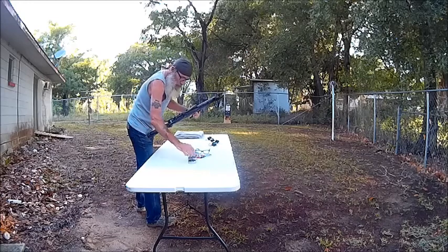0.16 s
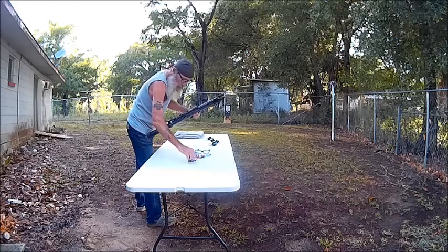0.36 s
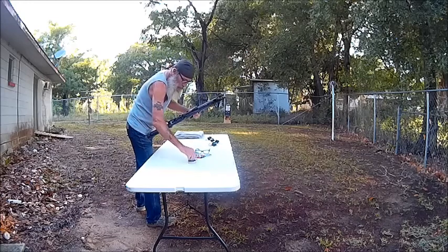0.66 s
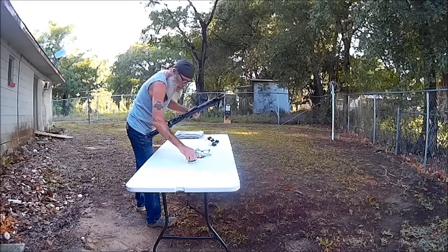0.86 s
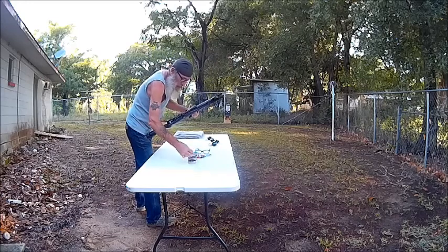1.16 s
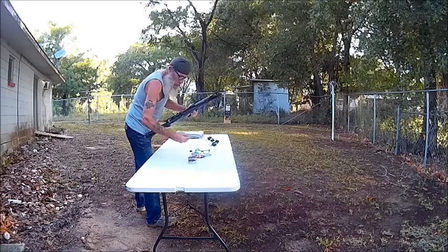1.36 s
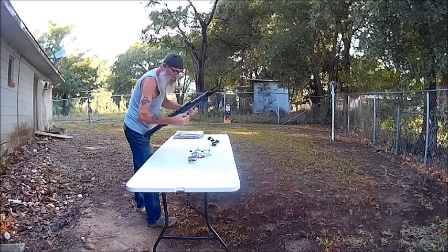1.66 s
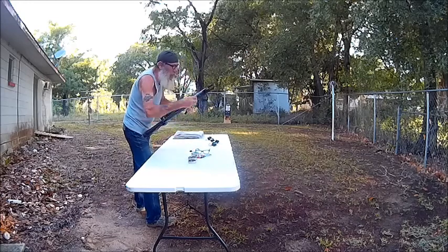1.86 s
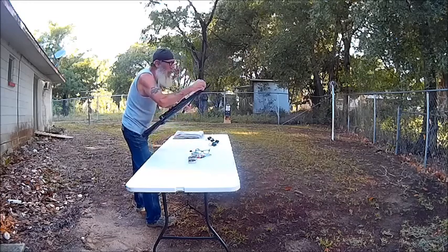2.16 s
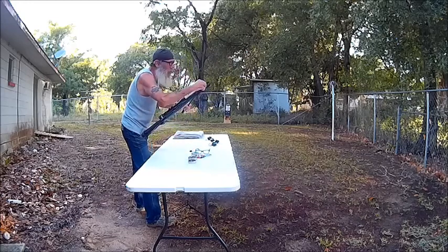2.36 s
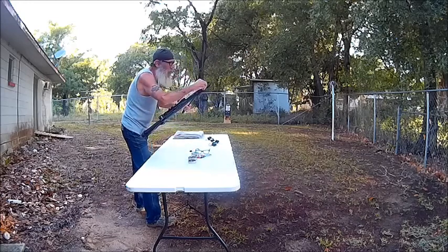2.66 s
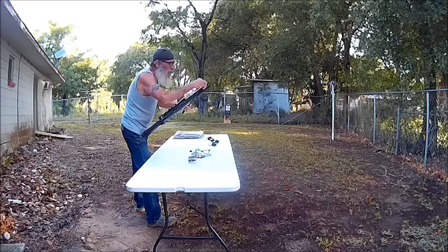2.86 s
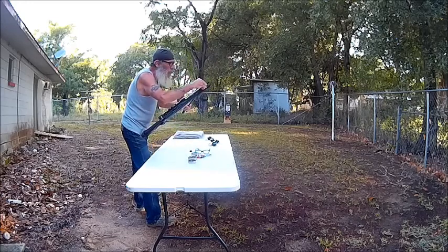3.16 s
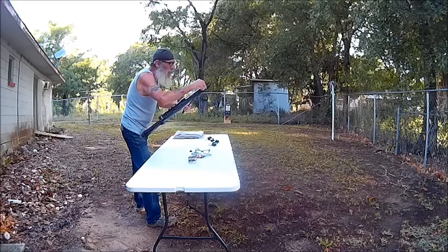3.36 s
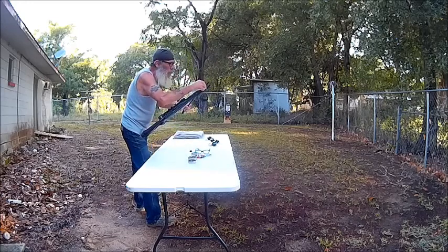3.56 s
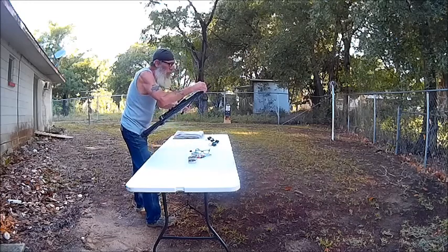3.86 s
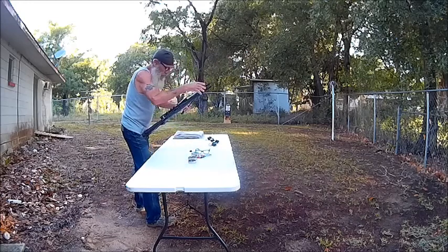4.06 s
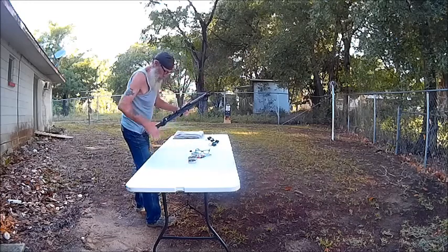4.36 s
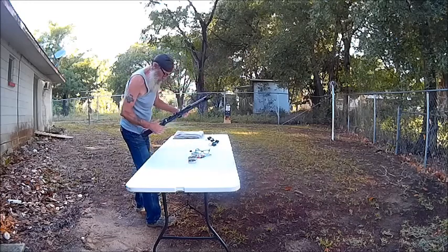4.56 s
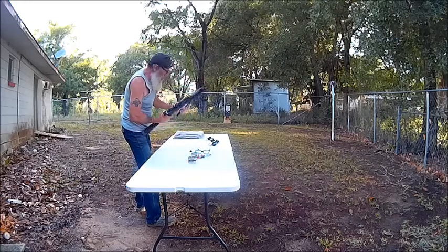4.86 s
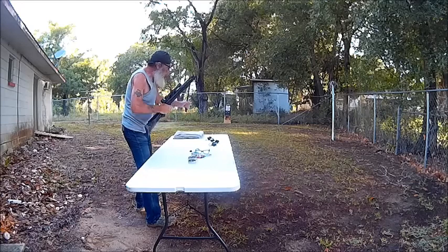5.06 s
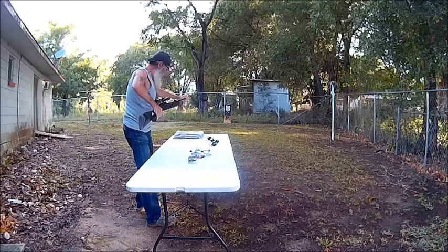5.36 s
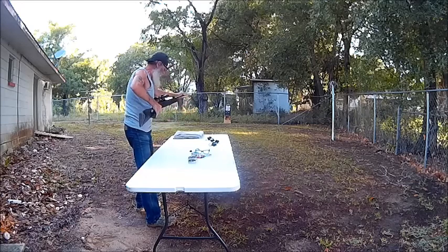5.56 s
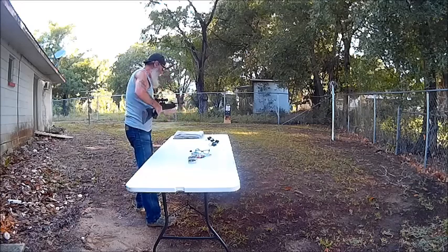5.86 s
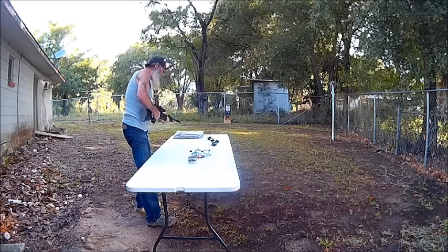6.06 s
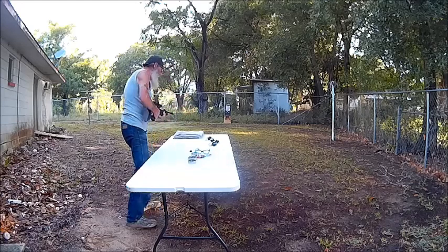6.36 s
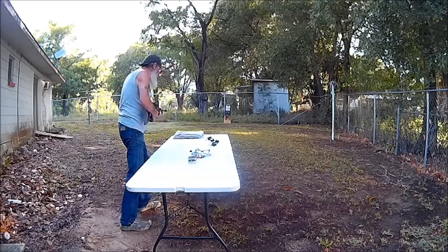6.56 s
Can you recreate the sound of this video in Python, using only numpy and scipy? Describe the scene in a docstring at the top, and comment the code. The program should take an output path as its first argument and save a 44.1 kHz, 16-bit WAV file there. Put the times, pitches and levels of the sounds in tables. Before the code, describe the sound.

An air rifle barrel swings shut with a brief squeak and a sharp clack, outdoors over a faint, steady air conditioner hum.

```python
"""An air conditioner hums in a backyard, its fan rushing over a low rumble and a faint, far engine.
A bird whistles, an air rifle clicks softly in the hands, and the engine speeds up. At five seconds the
barrel is swung shut: stick-slip friction makes the hinge scrape and squeal, the latch rides over its
catch, and the breech closes with a clack that excites the modes of steel and stock.
The ground, table, house wall and fence reflect the sound."""
import sys
import numpy as np
from scipy import signal
from scipy.fft import rfft, irfft, next_fast_len
from scipy.io import wavfile

SR = 44100
rng = np.random.default_rng(int(sys.argv[2]) if len(sys.argv) > 2 else 0)


def master_out(mix):
    """Clip the mix to full scale and print it as 16-bit PCM to the path in sys.argv[1]."""
    frames = np.transpose(np.atleast_2d(mix))
    ceiling = np.clip(frames, -1, 1)
    pcm = np.round(ceiling * 32767).astype(np.int16)
    wavfile.write(sys.argv[1], SR, pcm)


N = 296386
TIME = np.arange(N) / SR
CONTACT_RISE_S = .0006  # time constant with which an impact builds

# Outdoor rumble. Each row: frequency in Hz, relative spectral density in dB.
RUMBLE_SPECTRUM = [(10, -13), (25, -9.5), (45, 0.5), (110, 0.5), (180, -7.5), (260, -9.5), (480, -16),
                   (1000, -20), (2000, -27.5), (3300, -37.5), (8000, -57)]
# The microphone's self-noise. Each row: frequency in Hz, relative spectral density in dB.
HISS_SPECTRUM = [(1000, -1.5), (4000, 4), (6000, 2.5), (10000, 1.5), (14600, 0.5), (15700, -11)]
# The fan's rush. Each row: frequency in Hz, relative spectral density in dB.
FAN_SPECTRUM = [(200, -10.5), (480, -14.5), (650, -10), (1180, -7), (1380, 0.5), (1700, -0.5), (1800, -9.5),
                (2100, -24), (2350, -13), (2680, -18), (3150, -33), (5400, -35), (8000, -41)]
# How strongly the fan carries. Each row: time in seconds, relative level in dB.
FAN_ENVELOPE = [(0, -41), (.8, -41.3), (1.9, -43.3), (2.5, -45), (3.4, -46), (3.9, -43), (4.3, -46.5),
                (5.6, -45.5), (6.72, -43)]
# Resonances of compressor and casing. Each row: frequency in Hz, level in dB, line width in Hz.
CASING_LINES = [(126.3, -57, 2.7), (171.5, -57, 2.7), (581, -70.5, 18), (674, -65, 4.4), (1116, -66, 6.9),
                (1277, -65.5, 12), (1296, -60, 2.9), (1423, -62.5, 5.8), (1413, -58.5, 1.2),
                (1530, -50.5, 13), (1626, -56.5, 8), (1646, -58, 5.9), (1736, -67.5, 2.4),
                (2320, -69.5, 1.3), (9485, -79, 25), (9552, -87.5, 27)]
# The engine's exhaust. Each row: multiple of the cycle rate, relative level in dB.
EXHAUST_ORDERS = [(5, -6), (8, 0), (16, -10.5)]
# Pushes of the throttle. Each row: centre in seconds, half-width in seconds, boost in dB.
THROTTLE_PUSHES = [(4.6, 0.17, 11), (5.2, 0.18, 6.5)]
# The bird's whistles. Each row: start in seconds, level in dB.
BIRD_CALLS = [(.33, -60), (0.919, -61), (4.998, -60)]
# Reflections from ground, table, wall and fence. Each row: delay in seconds, gain in dB.
REFLECTIONS = [(.0092, -11), (.0125, -19), (.0172, -15), (.0275, -12), (.037, -20), (.046, -13),
               (.0555, -17)]
# The yard's reverberation. Each row: frequency in Hz, time to fall 60 dB in seconds.
YARD_DECAY = [(200, 0.63), (1100, 0.26), (1800, 0.37), (8000, 0.42), (15000, 0.28)]
# Modes of steel and stock. Each row: frequency in Hz, relative level in dB,
# time to fall 60 dB in seconds without the hands' damping.
RIFLE_MODES = [(300, -22, .043), (410, -14, .056), (500, -13, .025), (650, -19, .045), (790, -11, .028),
               (937, -8, .029), (1045, 3, .028), (1205, -4, .06), (1355, -5, .05), (1600, 2, .023),
               (1740, -9, .035), (1900, -8, .035), (2140, -20, .035), (2540, -9, .023), (2950, -16, .035),
               (5450, -30, .012), (7400, -28, .012)]
# The crack of metal on metal. Each row: frequency in Hz, relative spectral density in dB.
CRACK_SPECTRUM = [(100, -2), (600, -2), (1500, 5), (3100, 4), (3700, -4), (5500, -2), (7700, -2),
                  (8600, -17), (10500, -20), (11700, -14), (15500, -23)]
# Impacts of latch, breech and hands. Each row: start in seconds, ring gain in dB,
# lower cutoff of ring and crack in Hz, crack level in dB, upper cutoff of the crack in Hz.
IMPACTS = [(0.635, -50, 1500, -45, 1200), (.664, -49, 1500, -46.5, 1200), (5.071, -52, 1800, -49, 2500),
           (5.2594, -12.5, 1450, -26.5, 2400), (5.262, -18, 1640, -36.5, 3200),
           (5.2865, -42, 1900, -31, 1600), (5.3043, -44, 6550, -34.5, 15000),
           (5.3161, -12.5, 200, -25, 2000), (6.445, -57, 1800, -47, 2000), (6.669, -38, 1300, -38, 3800)]
# Rubbing steel. Each row: frequency in Hz, relative spectral density in dB.
RUB_SPECTRUM = [(60, -9), (140, 6.5), (400, -4), (680, 1.5), (950, -3.5), (1500, 7), (2250, -7.5),
                (2650, 0), (3100, -17), (5000, -20), (7600, -30), (9000, -37), (15000, -44)]
# Shoves that swing the barrel. Each row: start in seconds, length in seconds,
# relative friction level in dB, starting squeal frequency in Hz.
BARREL_SHOVES = [(5.028, 0.076, -45.5, 1558), (5.103, 0.1, -32.5, 1479), (5.199, 0.045, -28, 1670),
                 (5.237, 0.06, -33, 1520)]
# The stock's thud. One row: start in seconds, level in dB, time constant in seconds,
# lower and upper band edges in Hz.
STOCK_THUD = (5.3195, -23, .010, 540, 1400)


def amp(db):
    """Amplitude grows tenfold for every 20 dB."""
    return 10 ** (np.asarray(db) / 20)


def unit(x):
    """Normalisation to an rms of one."""
    return x / np.sqrt(np.mean(x ** 2) + 1e-20)


def value_at(points, hz):
    """Interpolation on a logarithmic frequency axis."""
    f, value = np.transpose(points)
    return np.interp(np.log(hz + 1), np.log(f + 1), value)


def add(mix, start, sound):
    """Superposition: a sound joins the mix at a time in seconds."""
    part = mix[max(round(start * SR), 0):][:len(sound)]
    part += sound[:len(part)]


def noise(spectrum, count=N):
    """Spectral shaping colours white noise; the rms is one."""
    size = next_fast_len(count)
    gain = amp(value_at(spectrum, np.fft.rfftfreq(size, 1 / SR)))
    return unit(irfft(rfft(rng.standard_normal(count), size) * gain, size)[:count])


def drift(rate_hz, count=4096):
    """Low-passed noise gives a random fluctuation, mostly slower than rate_hz."""
    f = np.fft.rfftfreq(count, TIME[-1] / count)
    slow = irfft(rfft(rng.standard_normal(count)) / (1 + (f / rate_hz) ** 2))
    return np.interp(TIME, np.linspace(0, TIME[-1], count), unit(slow))


def noise_floor(rumble_db=-46, hiss_db=-65):
    """Stationary noise: a distant rumble and an even hiss."""
    return amp(rumble_db) * noise(RUMBLE_SPECTRUM) + amp(hiss_db) * noise(HISS_SPECTRUM)


def air_conditioner(fan_db=-2.5, flutter_db=1.57, hum_hz=208.2, hum_db=-50.5, settle_s=1.84):
    """Broadband fan noise joins a settling compressor hum; random modulation widens the casing's lines."""
    carry_db = np.interp(TIME, *np.transpose(FAN_ENVELOPE))
    fan = amp(carry_db + fan_db + flutter_db * drift(6.8)) * noise(FAN_SPECTRUM)
    excess_db = 7.5 * np.exp(-TIME / settle_s)
    hum = amp(hum_db + excess_db) * np.sin(2 * np.pi * hum_hz * TIME + .11 * drift(2.2))
    whine = np.zeros(N)
    for hz, db, width_hz in CASING_LINES:
        waver = 1 + .64 * (drift(width_hz) + 1j * drift(width_hz))  # in amplitude and phase
        whine += amp(db) * (waver * np.exp(2j * np.pi * hz * TIME)).real
    return fan + hum + whine


def engine(slow_hz=13.25, fast_hz=18.6, slow_db=-62, fast_db=-45.5, midpoint_s=4.85, rise_s=.2):
    """Low harmonics of the engine cycle carry from afar, rising in pitch and level with its speed."""
    speed = 1 / (1 + np.exp((midpoint_s - TIME) / rise_s))  # S-curve from 0 to 1
    phase = 2 * np.pi * np.cumsum(slow_hz + (fast_hz - slow_hz) * speed) / SR
    throttle_db = sum(db * np.exp(-((TIME - s) / width) ** 2) for s, width, db in THROTTLE_PUSHES)
    exhaust = sum(amp(db) * np.sin(order * phase + .34 * drift(12)) for order, db in EXHAUST_ORDERS)
    return amp(slow_db + (fast_db - slow_db) * speed + throttle_db) * exhaust


def bird(from_hz=2450, to_hz=2920, length_s=.14):
    """Each whistle is a rising frequency sweep, smeared by scattering from the trees."""
    out, t = np.zeros(N), np.arange(0, length_s, 1 / SR)
    whistle = signal.chirp(t, from_hz, t[-1], to_hz) * signal.windows.tukey(len(t), .5)
    for start, db in BIRD_CALLS:
        add(out, start, amp(db) * whistle)
    return yard(out, tail_db=-7)


def yard(direct, tail_db=-11, dull_hz=6000, build_s=.021):
    """Reflection returns a few dulled echoes; scattering from fence and trees leaves a thin tail."""
    out = direct.copy()
    dulled = signal.lfilter(*signal.butter(1, dull_hz, fs=SR), direct)
    for delay, db in REFLECTIONS:
        add(out, delay, amp(db) * dulled)
    scatter = rng.choice([-1., 1.], SR) * (rng.random(SR) < 3000 / SR)  # about 3000 arrivals a second
    hz, t, spectra = signal.stft(scatter, SR, nperseg=256)
    envelope = amp(-60 * t / value_at(YARD_DECAY, hz)[:, None]) * (1 - np.exp(-t / build_s))
    tail = signal.istft(spectra * envelope / np.hypot(1, hz / dull_hz)[:, None], SR)[1]
    return out + amp(tail_db) * signal.fftconvolve(dulled, tail / np.linalg.norm(tail))[:N]


def knocks(contact_s=.0045, grip_db_per_s=350):
    """Impact excitation: contact cracks, then damped modes ring; small parts reach only the high ones."""
    out, t = np.zeros(N), np.arange(SR // 8) / SR
    attack = 1 - np.exp(-t / CONTACT_RISE_S)
    for start, ring_db, low_hz, crack_db, dull_hz in IMPACTS:
        ring = np.zeros(len(t))
        for k, (hz, db, t60) in enumerate(RIFLE_MODES):
            # neighbouring modes start in antiphase, so the low, closely spaced ones swell a little later
            coupling = (-1) ** k / np.sqrt(1 + (low_hz / hz) ** 10)
            envelope = amp(db - (60 / t60 + grip_db_per_s) * t)
            ring += coupling * envelope * np.sin(2 * np.pi * hz * t)
        grit = signal.lfilter(*signal.butter(2, low_hz, "high", fs=SR), noise(CRACK_SPECTRUM, len(t)))
        grit = signal.lfilter(*signal.butter(1, dull_hz, fs=SR), grit)
        crack = unit(grit) * np.exp(-(t / contact_s) ** 2)
        add(out, start, (amp(ring_db) * ring + amp(crack_db) * crack) * attack)
    return out


def hinge(slips_per_s=105, wobble_hz=55, sag_hz_per_s=2700, squeal_db=-1.5, rub_db=-2.5):
    """Stick-slip friction pulses a rub and a squeal, whose pitch sags as the hinge gives to each shove."""
    cycles = np.cumsum(slips_per_s * (1 + .204 * drift(105))) / SR
    slip = unit(.42 + np.sin(np.pi * cycles) ** 2)
    wobble = wobble_hz * drift(280)
    rub = np.sqrt(slip) * noise(RUB_SPECTRUM)
    out = np.zeros(N)
    for start, length, db, hz in BARREL_SHOVES:
        t = np.clip(TIME - start, 0, length)
        friction = amp(db) * abs(np.sin(np.pi * t / length)) ** .68  # swells and eases
        pitch_hz = hz - sag_hz_per_s * t + wobble
        squeal = unit(slip * np.sin(2 * np.pi * np.cumsum(pitch_hz) / SR))
        out += friction * (amp(squeal_db) * squeal + amp(rub_db) * rub)
    return out


def stock():
    """A heavily damped transient: the closing blow shakes the stock into a dull, toneless thud."""
    start, db, decay_s, low_hz, high_hz = STOCK_THUD
    out, t = np.zeros(N), np.arange(SR // 8) / SR
    band = signal.butter(2, [low_hz, high_hz], "band", fs=SR, output="sos")
    body = unit(signal.sosfilt(band, rng.standard_normal(len(t))))
    envelope = np.exp(-t / decay_s) * (1 - np.exp(-t / CONTACT_RISE_S))
    add(out, start, amp(db) * body * envelope)
    return out


def scene():
    """Superposition of the rifle, its reflections and the background in one channel."""
    rifle = yard(knocks() + stock() + hinge())
    return (rifle + air_conditioner() + engine() + bird() + noise_floor())[None]


def record(dry, cutoff_hz=15750):
    """Band limiting: a linear-phase low-pass filter removes the highest treble."""
    lowpass = signal.firwin(511, cutoff_hz, window=("kaiser", 9), fs=SR)
    return signal.oaconvolve(dry, lowpass[None], "same")


dry = scene()
out = record(dry)
master_out(out)
```